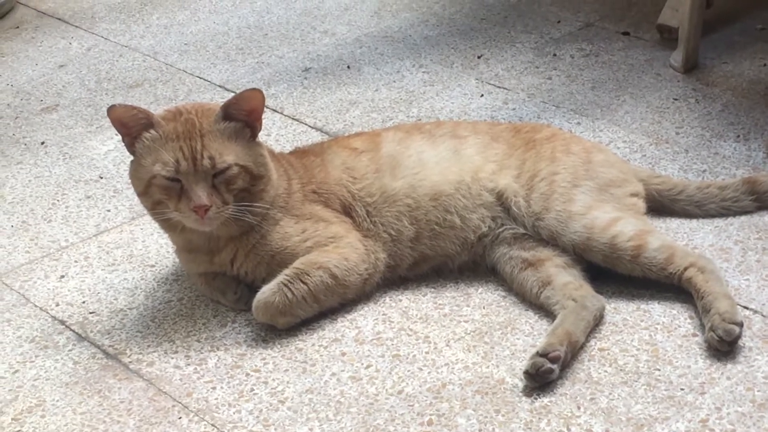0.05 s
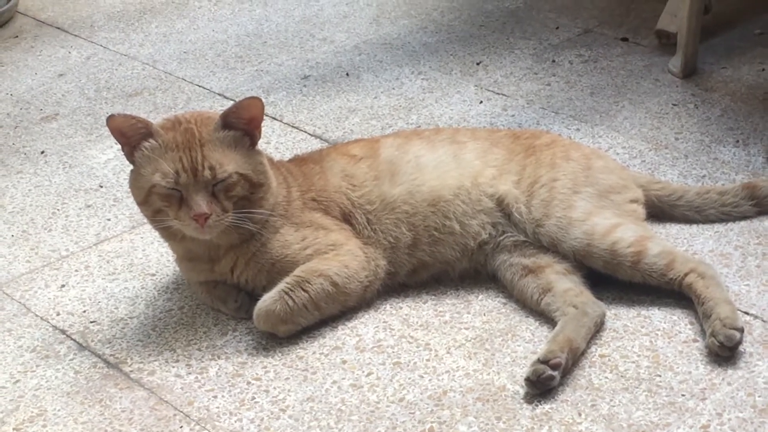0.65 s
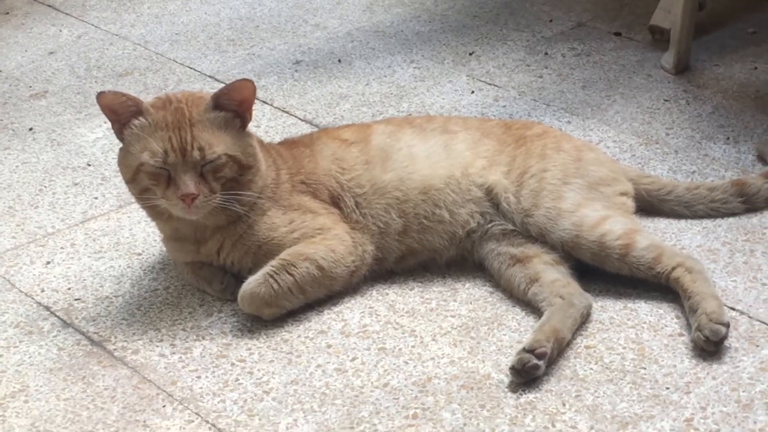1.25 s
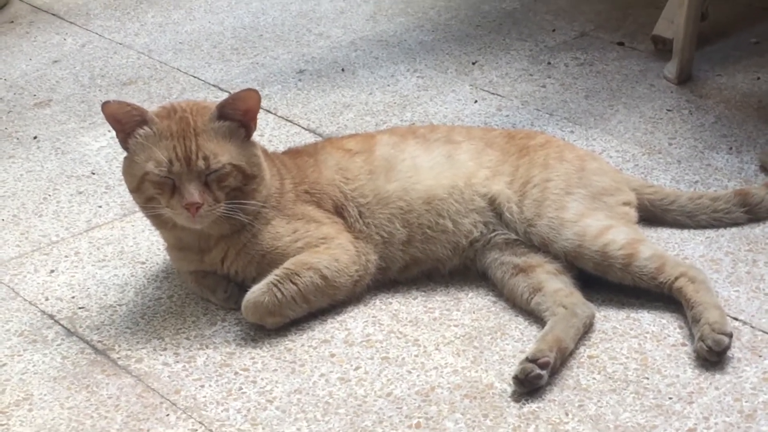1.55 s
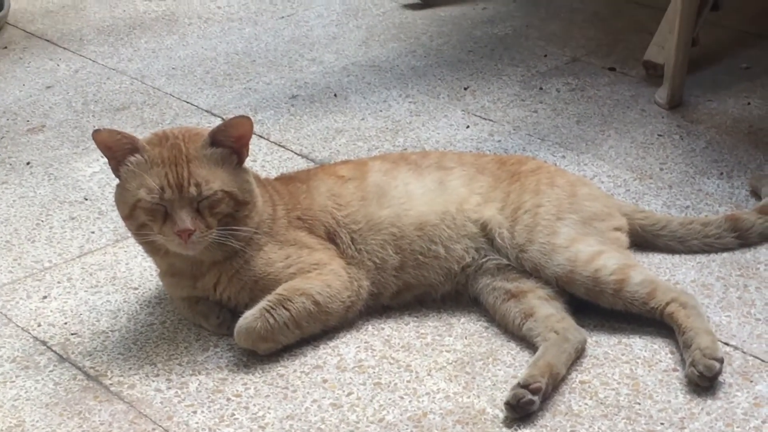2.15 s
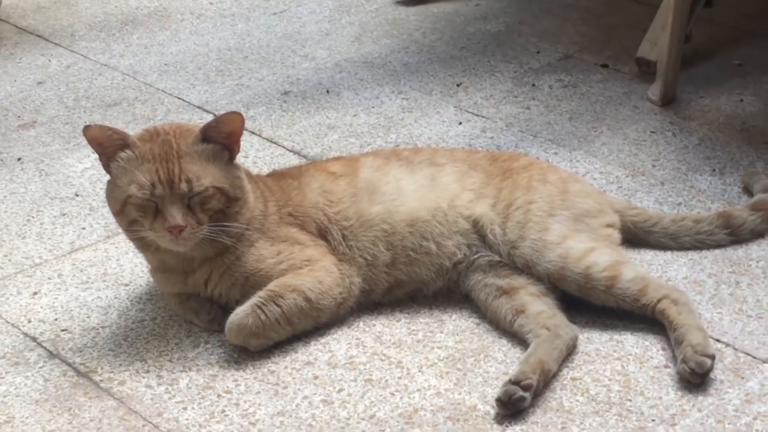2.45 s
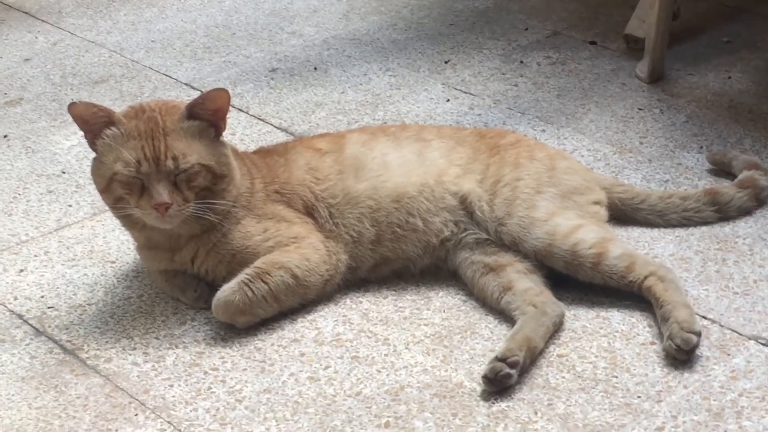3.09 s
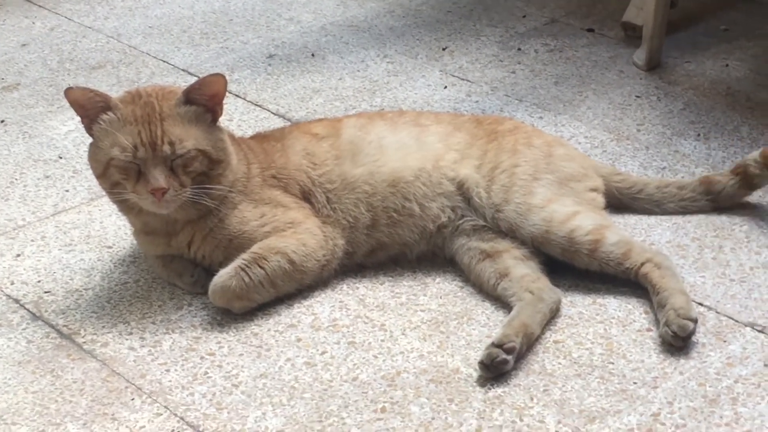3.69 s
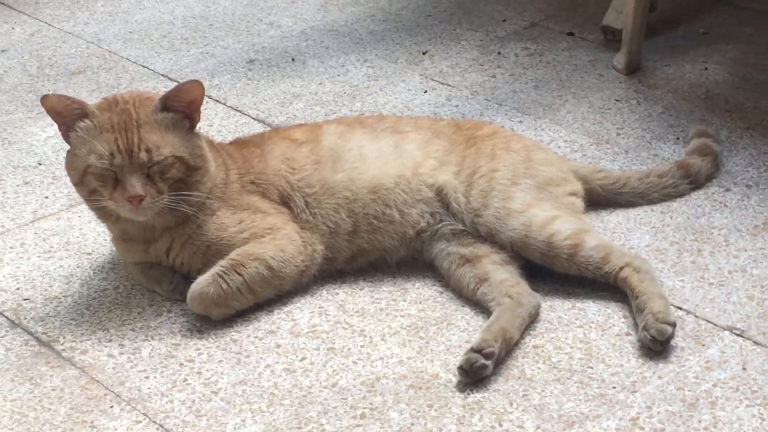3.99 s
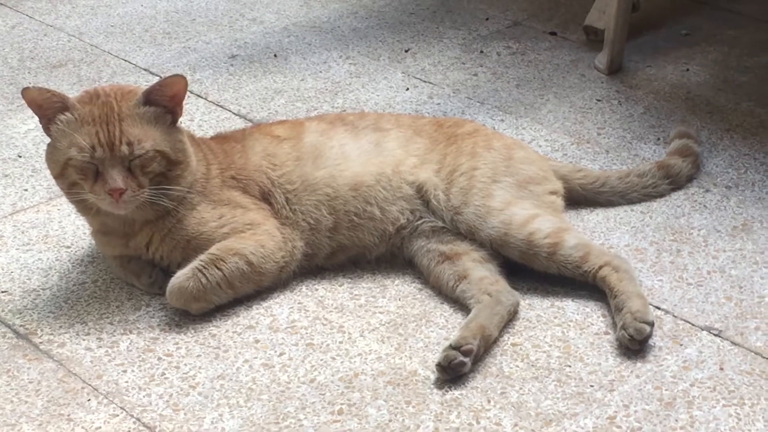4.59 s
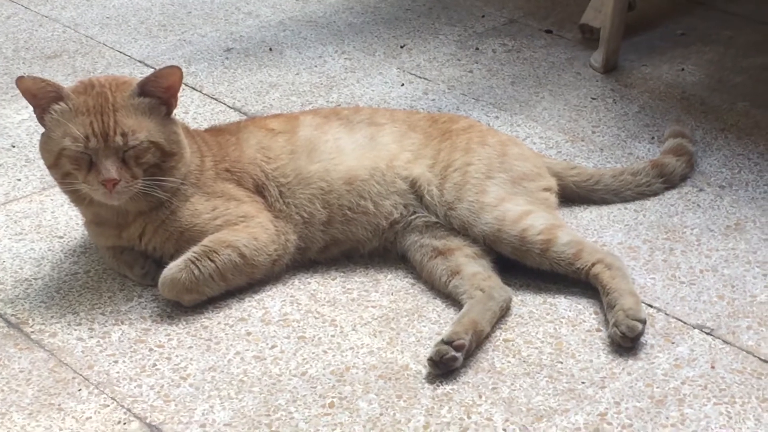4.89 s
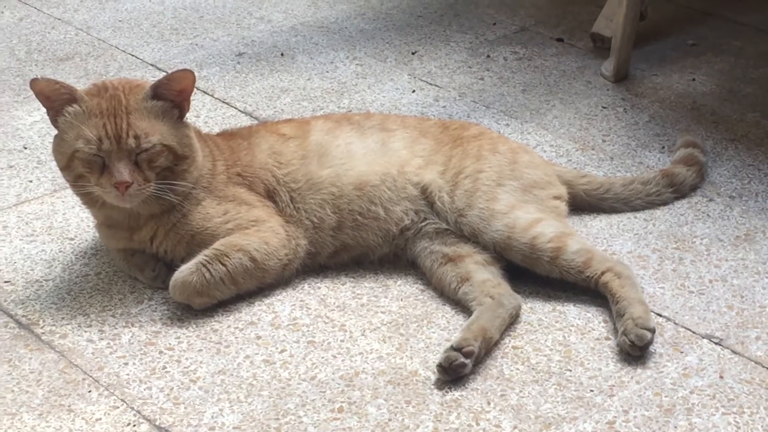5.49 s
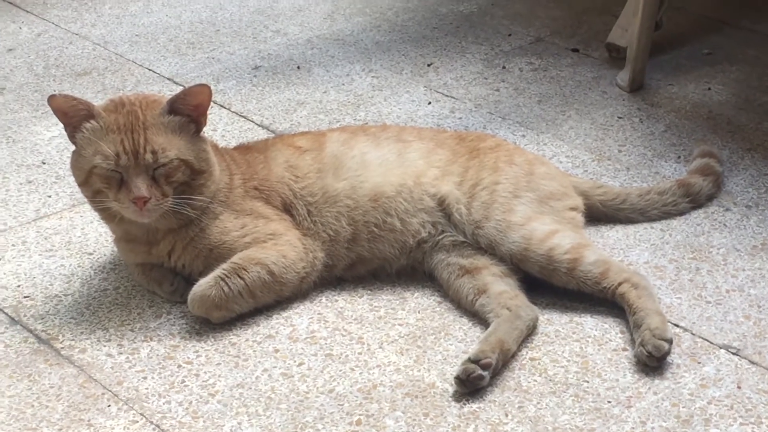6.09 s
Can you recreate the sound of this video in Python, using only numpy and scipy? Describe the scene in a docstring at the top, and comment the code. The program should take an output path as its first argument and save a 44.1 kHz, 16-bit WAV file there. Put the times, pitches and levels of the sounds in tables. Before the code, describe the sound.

Short, high bird chirps echo in a yard above humming machinery and a traffic rumble, while a far-off dog barks once.

```python
"""A small bird chirps in a paved yard, heard at one microphone; the walls throw each note back.
Its syrinx whistles quick arcs of pitch, with softer, higher notes between the loud ones.
Far off, a dog gives one hoarse bark and other birds call faintly. Close to the microphone
there is one brief rustle and a few faint ticks. Behind it all, machinery hums steadily
under the rumble of distant traffic."""
import sys
import numpy as np
from scipy import signal
from scipy.fft import rfft, irfft, next_fast_len
from scipy.io import wavfile
from scipy.ndimage import map_coordinates

SR = 44100
rng = np.random.default_rng(int(sys.argv[2]) if len(sys.argv) > 2 else 0)


def transcribe(u):
    """Save the signal u as a 16-bit wav file named by the first command-line argument.

    u: samples, shape (n,) or (channels, n), limited to [-1, 1]; the rate is SR.
    q: integer samples, one column per channel.
    """
    v = np.clip(np.atleast_2d(u).T, -1, 1)
    q = np.round(v * 32767).astype(np.int16)
    wavfile.write(sys.argv[1], SR, q)


N = 279725

# syllables of each kind of note: onset t/s, length/s, start f/Hz, middle f/Hz, end f/Hz, level/dB
LOUD_CHIRP = [(.002, 0.0141, 3910, 4360, 4540, -7), (0.018, 0.022, 4800, 5040, 4960, -12.5),
              (0.03, .018, 4550, 4510, 4460, -4), (0.04, 0.0162, 4400, 4020, 3480, -3),
              (0.05, .016, 3400, 3580, 3600, -3.5), (.080, 0.0255, 3296, 3687, 4170, -1.5),
              (0.103, 0.0189, 3920, 3602, 3370, -10.5)]
FLAT_CHIRP = [(.002, 0.0144, 3920, 4200, 4450, -9.5), (.014, 0.019, 4620, 4880, 4700, -12.5),
              (.027, .0235, 4400, 4260, 3950, -3), (.046, 0.02, 3830, 3525, 3520, -7.5),
              (.082, .022, 3400, 3620, 4000, -2), (.103, 0.0184, 3700, 3534, 3450, -4.5)]
TWITTER = [(0, .03, 5120, 5696, 5810, -2), (.024, .022, 4850, 4554, 4480, 0.5),
           (.078, 0.0298, 4300, 4020, 3740, -3)]
DOUBLE_PEEP = [(.002, 0.03, 5130, 5300, 5290, -2), (.012, 0.038, 5400, 5680, 5400, -8),
               (.03, 0.018, 4540, 4490, 4500, -2.5), (.058, .026, 5320, 5250, 5000, -7.5),
               (.088, 0.0262, 4550, 4150, 3820, -7.5)]
THIN_WHISTLE = [(0.0013, 0.07, 6070, 6120, 6060, -1.5)]
DOWN_SLUR = [(.005, .035, 4220, 4040, 3850, 1), (.05, 0.0506, 3766, 3580, 3260, -1.5)]


def bird(loud_db=-0.5, soft_db=-3, loud_wall_db=-3, soft_wall_db=-7, wet_db=-1.5):
    """In the yard: loud chirps arrive directly and bounce hard off walls; soft notes are more diffuse."""
    # the song: t/s, level/dB, pitch factor, length factor, flutter as a share of the pitch, kind
    notes = [(0.429, -73, .76, .6, .035, THIN_WHISTLE), (1.106, -66, 0.99, 0.92, 0.029, TWITTER),
             (1.507, -51, 1.005, .98, .034, FLAT_CHIRP), (1.758, -61, 0.98, 1, 0.037, DOWN_SLUR),
             (1.931, -74, 0.81, .7, .035, THIN_WHISTLE), (1.995, -74.5, 1, 1.05, .04, THIN_WHISTLE),
             (2.353, -64.5, 0.99, 1.04, .055, TWITTER), (3.14, -78, .955, .8, .035, THIN_WHISTLE),
             (3.21, -76, 1.1, .6, .03, DOWN_SLUR), (3.402, -63, 0.99, 0.9, 0.042, TWITTER),
             (3.78, -69, 0.82, .75, .045, THIN_WHISTLE), (3.825, -73, .993, 1.2, 0.017, THIN_WHISTLE),
             (4.441, -68, .995, 1.05, 0.033, TWITTER), (4.609, -49.5, 0.98, 1.04, .032, LOUD_CHIRP),
             (5.271, -73, 0.93, 0.87, 0.062, THIN_WHISTLE), (5.322, -61, 0.95, 0.89, .038, DOUBLE_PEEP),
             (5.814, -67.5, .965, 0.84, .028, TWITTER), (5.962, -49.5, 1.01, 1, 0.031, LOUD_CHIRP)]
    # echoes off the yard walls: delay/s, level/dB
    walls = [(.004, -3), (.0115, -6), (.027, -9), (.050, -9), (.125, -13), (.16, -16), (.188, -18),
             (.295, -21)]
    direct, to_walls, sung = np.zeros((3, N))
    for s, db, pitch, stretch, flutter, kind in notes:
        loud = kind in (LOUD_CHIRP, FLAT_CHIRP)
        note = np.zeros(N)
        for onset, length, *pitches, accent_db in kind:
            syllable = whistle(s + stretch * onset, stretch * length, pitch * np.array(pitches), flutter)
            note += amp(db + accent_db) * syllable
        sung += note
        direct += note * amp(loud_db if loud else soft_db)
        to_walls += note * amp(loud_wall_db if loud else soft_wall_db)
    diffuse = amp(wet_db) * reverberation(sung, build_s=0.0028)
    return direct + ringing(echoed(to_walls, walls) + diffuse)


def whistle(start, length, pitches, flutter, fade_share=0.39):
    """One syllable: a pure tone on an arc of pitch, with a fast flutter of the syrinx."""
    t = np.arange(int(length * SR)) / SR
    tremble = map_coordinates(rng.standard_normal(200), [t * 450])
    phase = 2 * np.pi * np.cumsum(arc(t / length, pitches) * (1 + flutter * tremble)) / SR
    tone = np.sqrt(2) * np.sin(phase) * signal.windows.tukey(len(t), fade_share)
    return np.pad(tone, (round(start * SR), N))[:N]


def echoed(x, walls):
    """Each wall returns a delayed, weaker copy to the microphone."""
    return sum(amp(db) * np.pad(x, (round(delay * SR), 0))[:N] for delay, db in walls)


def reverberation(x, build_s):
    """The yard's diffuse answer: it builds up, then each frequency dies at its own speed."""
    # a few pitches linger between the walls: f/Hz, time to fall 60 dB/s
    decay_times = [(500, 1.2), (1500, 0.8), (3200, .62), (3570, 0.62), (3900, 0.72), (4300, 0.86),
                   (4520, 0.85), (4800, 0.44), (5200, .85), (5600, 0.61), (10000, 0.53)]
    hz, t, spectra = signal.stft(rng.standard_normal(SR), SR, nperseg=512)
    shape = amp(-60 * t / along(decay_times, hz)[:, None]) * (1 - np.exp(-t / build_s))
    tail = signal.istft(spectra * shape, SR, nperseg=512)[1]
    return signal.fftconvolve(x, tail / np.linalg.norm(tail))[:N]


def ringing(x):
    """Sound caught between the walls rings on at a few narrow pitches."""
    # yard resonances: f/Hz, width/Hz, level/dB
    modes = [(655, 21, -1), (774, 21, 7), (1258, 22, 6), (1545, 27, -5), (1696, 36, -6.5), (3550, 77, -12),
             (4480, 120, -11), (5180, 70, -1.5), (6030, 90, -6)]
    return filtered(x, lambda f: 1 + sum(amp(db) / (1 + 2j * (f - hz) / bw) for hz, bw, db in modes))


def dog(chest_db=-39, mouth_db=-41, jitter=.036, rasp_db=1, alternation=0.98, direct_db=-4.5, wet_db=-10):
    """Far off, one hoarse, falling bark: uneven pulses and gated noise through the sinking throat."""
    # resonances of chest and mouth: f/Hz, level/dB
    chest = [(350, -33), (560, -14.5), (660, 4), (770, -0.5), (860, -9), (1100, -24), (1600, -72)]
    mouth = [(600, -40), (780, -14), (920, 4.5), (1090, 1), (1370, 1.5), (1580, 6.5), (1780, 4.5),
             (1930, -12), (2300, -27), (3200, -73)]
    # the mouth opens after the chest tone starts and closes sooner: t/s, attack/s, hold/s, release/s
    chest_stages = (4.1, .135, 0.0557, 0.0599)
    jaw_stages = (4.11, 0.06, 0.044, 0.087)
    # pitch of the bark: start f/Hz, middle f/Hz, end f/Hz
    bark_hz = (410, 370.2, 325.8)
    # echoes off the houses: delay/s, level/dB
    houses = [(.0125, -4.5), (.044, -11), (.13, -19), (.18, -14.5), (.3, -15), (.42, -25)]
    pitch = arc((np.arange(N) / SR - chest_stages[0]) / sum(chest_stages[1:]), bark_hz)
    phase = 2 * np.pi * np.cumsum(pitch * (1 + jitter * wobble(160))) / SR
    pulses = unit(sum(np.cos(k * phase) for k in range(1, 8)))
    pulses = unit(pulses * (1 + alternation * np.cos(phase / 2)))  # strong and weak pulses alternate
    rasp = unit(filtered(rng.standard_normal(N) * (1 + np.cos(phase)), lambda hz: hz < 2800))
    voice = pulses + amp(rasp_db) * rasp
    bark = amp(chest_db) * throat(voice, chest, chest_stages, sag=0.027)
    bark += amp(mouth_db) * throat(voice, mouth, jaw_stages, sag=0.038)
    diffuse = amp(wet_db) * reverberation(bark, build_s=0.0036)
    return ringing(amp(direct_db) * (bark + echoed(bark, houses)) + diffuse)


def throat(voice, spectrum, stages, sag):
    """The voice through resonances that sink from a share sag above their pitch to as far below it."""
    start, *lengths = stages
    progress = np.clip((np.arange(N) / SR - start) / sum(lengths), 0, 1)
    closing = progress ** 2 * (3 - 2 * progress)
    high = coloured(voice, [(hz * (1 + sag), db) for hz, db in spectrum])
    low = coloured(voice, [(hz * (1 - sag), db) for hz, db in spectrum])
    return envelope(stages) * unit((1 - closing) * high + closing * low)


def far_birds(direct_db=-3, wet_db=-5):
    """Faint coos and whistles from beyond the yard."""
    # calls: t/s, length/s, start f/Hz, end f/Hz, level/dB
    coos = [(.02, 0.065, 517, 515, -60.5), (.11, 0.054, 517, 507, -54), (0.318, 0.062, 2060, 2000, -66.5),
            (0.55, 0.065, 887, 950, -65), (0.662, 0.055, 943, 892, -68), (2.416, 0.063, 647, 645, -57.5),
            (6.149, .06, 366, 360, -58)]
    calls = sum(amp(db) * whistle(s, length, np.linspace(start_hz, end_hz, 3), flutter=0.016)
                for s, length, start_hz, end_hz, db in coos)
    return amp(direct_db) * calls + amp(wet_db) * reverberation(calls, build_s=0.0044)


def handling(t60=0.1, rise_s=0.003, rustle_db=-71):
    """A short rustle and tiny dry ticks close to the microphone."""
    # ticks: t/s, level/dB, dull above f/Hz
    ticks = [(1.153, -54, 15000), (1.16, -60.5, 15000), (1.599, -53.5, 8020), (5.288, -68, 12000)]
    # noise spectra of tick and rustle: f/Hz, level/dB
    tick_colour = [(800, -18), (2200, 1), (4500, -2.5), (7000, -15), (15000, -15)]
    rustle_colour = [(1200, -24), (2400, -1), (5000, 0), (10000, -4), (12300, -4), (15000, -18)]
    # the rustle's swell: t/s, attack/s, hold/s, release/s
    rustle_stages = (0.39, 0.22, 0.032, 0.17)
    t = np.arange(N) / SR
    crackle, snaps = noise(tick_colour), np.zeros(N)
    for s, db, dull_hz in ticks:
        age = np.maximum(t - s, 0)
        snap = crackle * amp(db - 60 * age / t60) * (1 - np.exp(-age / rise_s))
        snaps += filtered(snap, lambda hz: 1 / np.sqrt(1 + (hz / dull_hz) ** 8))
    return snaps + amp(rustle_db) * envelope(rustle_stages) * noise(rustle_colour)


def machinery(waver_db=1.5, drift_rad=0.24):
    """Background motor tones that waver a little in level and phase."""
    # motor tones: f/Hz, rms level/dB
    hum = [(49.4, -42), (86.4, -56), (163.5, -55), (199, -56.5), (218.5, -65.5), (236.5, -62.5), (251, -61),
           (309, -64)]
    t = np.arange(N) / SR
    return sum(np.sqrt(2) * amp(db + waver_db * wobble(4.014))
               * np.sin(2 * np.pi * hz * t + drift_rad * wobble(2.99)) for hz, db in hum)


def traffic(air_db=-59, unsteady_db=1.5):
    """Distant roads: rumble, drone and tyre noise each swell slowly over a faint even hiss."""
    # noise spectra of the four layers: f/Hz, level/dB
    rumble_colour = [(20, -54), (30, -30), (37, -11.5), (44, 5.5), (52, -3), (62, -8), (74, -11),
                     (88, -2.5), (102, -7.5), (118, -1), (133, -16.5), (160, -33), (300, -79)]
    drone_colour = [(90, -31), (135, -12), (152, -0.5), (166, 3), (180, -9.5), (200, -7.5), (240, -14.5),
                    (280, -15.5), (315, -13.5), (360, -28.5), (450, -35), (800, -73.5)]
    tyre_colour = [(450, -37), (700, 1), (980, 1.5), (1400, -7), (1850, -9), (2300, -24), (4000, -35.5)]
    air_colour = [(250, -7), (360, 1.5), (450, 0), (560, -6), (800, -21), (1500, -22), (2500, -20),
                  (4800, -27.5), (6100, -28), (7400, -32.5), (9000, -32), (10400, -39), (11500, -36),
                  (15500, -42)]
    # slow swell: t/s, rumble level/dB, drone level/dB, tyre level/dB
    swell = [(0, -41.5, -42.5, -64.5), (.4, -43.5, -45, -63.5), (.7, -41.5, -43, -62),
             (1.4, -42.5, -46, -62.5), (2.1, -39, -44, -60.5), (2.8, -44, -43.5, -63),
             (3.4, -39.5, -42, -63), (4.2, -43.5, -45.5, -59.5), (4.7, -40, -41.5, -62),
             (5.4, -43.5, -45.5, -63), (6.34, -43.5, -42, -62)]
    rumble_db, drone_db, tyre_db = curves(swell)
    rumble = amp(rumble_db + unsteady_db * wobble(7)) * noise(rumble_colour)
    drone = amp(drone_db + unsteady_db * wobble(9)) * noise(drone_colour)
    tyres = amp(tyre_db + 1.92 * wobble(12)) * noise(tyre_colour)
    air = amp(air_db + 0.085 * wobble(6.4)) * noise(air_colour)
    return rumble + drone + tyres + air


def throbs(drift_rad=0.74):
    """Now and then one low pitch of the distant rumble swells up and sinks back."""
    # swells: peak t/s, half-width/s, f/Hz, level/dB
    swells = [(.39, 0.11, 115, -39.5), (.45, 0.042, 163, -39), (1.92, 0.065, 158, -40),
              (2.35, 0.081, 165, -37.5), (3, 0.074, 116, -43), (3.36, .07, 162, -41.5),
              (3.92, 0.079, 85, -39.5), (4.66, .08, 161, -44), (4.9, 0.11, 113, -40.5)]
    t = np.arange(N) / SR
    return sum(np.sqrt(2) * amp(db) * np.exp(-((t - s) / width) ** 2)
               * np.sin(2 * np.pi * hz * t + drift_rad * wobble(19.6)) for s, width, hz, db in swells)


def amp(db):
    """Decibels to gain."""
    return 10 ** (np.asarray(db) / 20)


def unit(x):
    """Scale to rms 1."""
    return x / np.sqrt(np.mean(x ** 2) + 1e-20)


def arc(progress, pitches):
    """A smooth bend through a start, middle and end pitch as progress runs from 0 to 1."""
    return np.polyval(np.polyfit([0, .5, 1], pitches, 2), np.clip(progress, 0, 1))


def envelope(stages):
    """Gain that swells, holds and dies away."""
    return np.interp(np.arange(N) / SR, np.cumsum(stages), [0, 1, 1, 0]) ** 2


def along(points, hz):
    """Interpolate (f/Hz, value) points on a log frequency axis."""
    f, values = np.transpose(points)
    return np.interp(np.log(hz + 1), np.log(f + 1), values)


def curves(rows):
    """One value per sample for each column after the time."""
    times, *columns = np.transpose(rows)
    return [np.interp(np.arange(N) / SR, times, column) for column in columns]


def wobble(rate):
    """A smooth random curve, rate knots a second."""
    return map_coordinates(rng.standard_normal(int(N * rate / SR) + 4), [np.arange(N) * rate / SR])


def filtered(x, response):
    """x through a gain that depends on frequency."""
    size = next_fast_len(N + SR // 2)
    return irfft(rfft(x, size) * response(np.fft.rfftfreq(size, 1 / SR)), size)[:N]


def coloured(x, spectrum):
    """x shaped by (f/Hz, level/dB) points, at rms 1."""
    return unit(filtered(x, lambda hz: amp(along(spectrum, hz))))


def noise(spectrum):
    """Coloured noise of rms 1."""
    return coloured(rng.standard_normal(N), spectrum)


def scene():
    """Everything at one microphone in the yard."""
    return (bird() + far_birds() + dog() + machinery() + traffic() + throbs() + handling())[None]


def record(dry, top_hz=15700):
    """The recorder eases in and out over a few milliseconds and keeps nothing above its band limit."""
    eased = dry * signal.windows.tukey(N, .002)
    return np.array([filtered(channel, lambda hz: hz < top_hz) for channel in eased])


dry = scene()
out = record(dry)
transcribe(out)
```